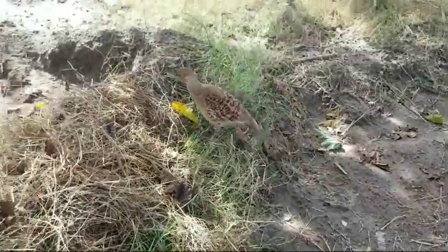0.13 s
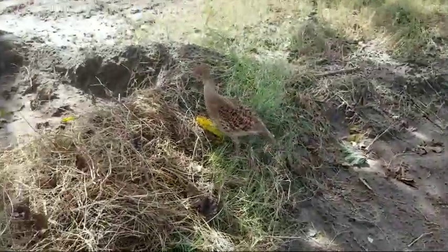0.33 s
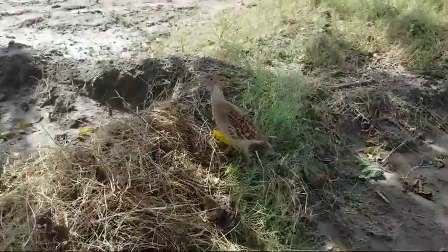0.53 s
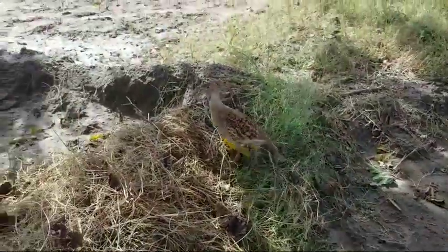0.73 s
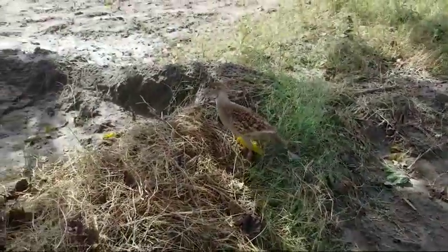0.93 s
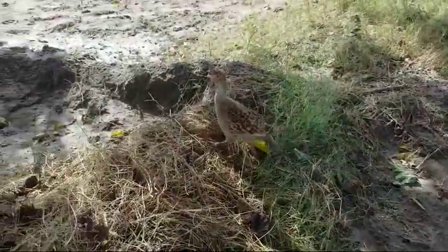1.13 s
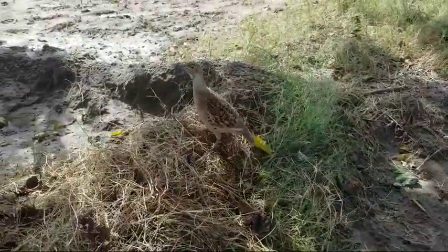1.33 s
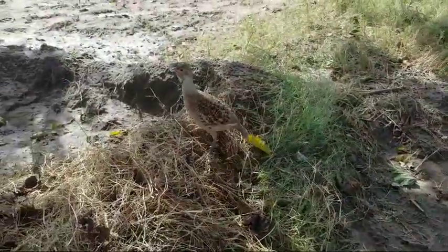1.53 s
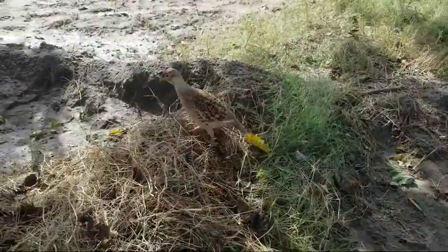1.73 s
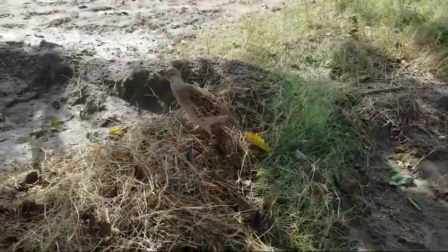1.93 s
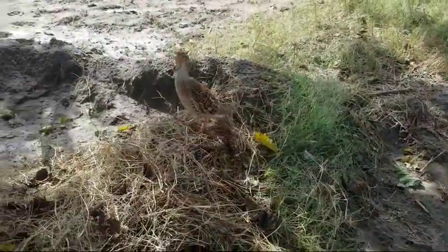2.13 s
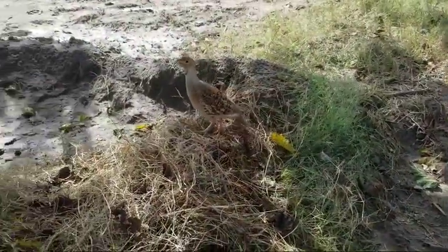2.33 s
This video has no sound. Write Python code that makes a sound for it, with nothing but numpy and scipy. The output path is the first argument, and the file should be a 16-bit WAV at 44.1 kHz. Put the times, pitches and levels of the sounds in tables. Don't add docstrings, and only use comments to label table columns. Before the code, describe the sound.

Loud partridge-like calling outdoors: a clear high whistle snaps into grating notes, then hoarse clucks die away, repeated three times, the last cut short; short ground echo, slight low wind rumble, a faint dry grass tick.

```python
import sys
import numpy as np
from scipy import signal
from scipy.fft import rfft, irfft
from scipy.io import wavfile
from scipy.ndimage import uniform_filter1d, map_coordinates

SR = 44100
rng = np.random.default_rng(int(sys.argv[2]) if len(sys.argv) > 2 else 0)


def ratio_of_db(decibels):
    return 10 ** (np.asarray(decibels, float) / 20)


def inscribe(sig):
    pcm = np.round(np.clip(np.atleast_2d(sig).T, -1, 1) * 32767)
    wavfile.write(sys.argv[1], SR, pcm.astype(np.int16))


N = 105840
T = np.arange(N) / SR


def at_hz(points, hz):
    p = np.array(points, float)
    return np.interp(np.log(hz + 1), np.log(p[:, 0] + 1), p[:, 1])


def rms_one(x):
    return x / np.sqrt(np.mean(x ** 2) + 1e-20)


def colour(x, points):
    hz = np.arange(N // 2 + 1) * SR / N
    return irfft(rfft(x) * ratio_of_db(at_hz(points, hz)), N)


def drift(rate_hz):
    r = np.exp(-2 * np.pi * rate_hz / SR)
    noise = rng.standard_normal(N + SR)
    return rms_one(signal.lfilter([1], [1, -2 * r, r * r], noise)[SR:])


def resonance(x, hz, width_hz):
    r = np.exp(-np.pi * width_hz / SR)
    poles = [1, -2 * r * np.cos(2 * np.pi * hz / SR), r * r]
    return signal.lfilter([(1 - r * r) / 2, 0, (r * r - 1) / 2], poles, x + 1e-18)


def gate(start, length, attack, release):
    ramp = np.minimum((T - start) / attack, (start + length - T) / release)
    return np.sin(np.pi / 2 * np.clip(ramp, 0, 1)) ** 2


def pulses(rate_hz, jitter, spread_db):
    cycle = np.cumsum(rate_hz * np.exp(jitter * drift(400))) / SR
    click = np.diff(np.floor(cycle), prepend=0) > 0
    return click * ratio_of_db(spread_db * rng.standard_normal(N)) * np.sqrt(SR / rate_hz)


def field():
    # frequency in Hz, level in dB.
    hiss_colour = [(300, 7), (500, 6), (1200, 3), (3000, 0.5), (8000, -0.5), (15500, -1.5)]
    return ratio_of_db(-68.5) * rms_one(colour(rng.standard_normal((2, N)), hiss_colour))


def wind():
    # time in seconds, level in dB.
    wind_level = [
        (0, -65),
        (.3, -65.5),
        (.75, -62.5),
        (1.2, -64.5),
        (1.55, -64.5),
        (1.63, -58.5),
        (1.75, -79.5),
        (2.4, -91.5),
    ]
    # frequency in Hz, level in dB.
    wind_colour = [(15, -33.5), (30, -5), (80, 1.5), (130, -4.5), (310, -18.5), (450, -36), (900, -49),
                   (16000, -65.5)]
    alike, patchy_db = 0.7, 1.5
    mid, side = colour(rng.standard_normal((2, N)), wind_colour)
    pair = rms_one(np.sqrt(1 + alike) * mid + np.sqrt(1 - alike) * side * [[1], [-1]])
    level_db = np.interp(T, *np.transpose(wind_level)) + 2.5
    return pair * ratio_of_db(level_db + patchy_db * drift(2.7))


def gulps():
    # start in seconds, level in dB.
    gulp_events = [
        (.171, -34.5),
        (0.949, -35),
        (1.796, -41),
    ]
    length_s, start_hz, sag = 0.027, 286, 0.62
    out, ring = np.zeros(N), np.zeros(N)
    for hz, width, outer_width, db in [(1320, 400, 550, -17.5), (3660, 500, 600, -20.5)]:
        narrow = resonance(rng.standard_normal(N), hz, width)
        ring += ratio_of_db(db) * rms_one(resonance(narrow, hz, outer_width))
    for s, db in gulp_events:
        t = T - s
        phase = 2 * np.pi * start_hz * t * (1 - sag * t / length_s / 2)
        tone = np.sin(phase) + ratio_of_db(-14.5) * np.sin(2 * phase)
        out += ratio_of_db(db) * gate(s, length_s, 0.0036, 0.0085) * (tone + ring)
    return out


def whistles():
    # time in seconds, pitch in Hz, level in dB.
    whistle_paths = [
        [(.189, 3350, -51), (.194, 3427, -29.5), (.198, 3695, -17.5), (.206, 3762, -10), (.218, 3859, -14.5),
         (.254, 3877, -16), (.31, 3801, -14), (.34, 3815, -25.5), (.349, 3890, -55.5)],
        [(.973, 3477, -50.5), (.977, 3600, -30.5), (.988, 3800, -12), (1.01, 3926, -12), (1.03, 3980, -15.5),
         (1.06, 3974, -14.5), (1.12, 3968, -16.5), (1.14, 3897, -23), (1.157, 3730, -52.5)],
        [(1.819, 3400, -50.5), (1.824, 3440, -35), (1.833, 3850, -16.5), (1.846, 3948, -16),
         (1.851, 4063, -25.5), (1.858, 4245, -18.5), (1.93, 4273, -18), (2.0, 4184, -29), (2.018, 4220, -49)],
    ]
    # start in seconds, length in seconds, offset from the whistle in Hz, level in dB.
    second_side = [(0.265, .02, 200.5, -8.5), (1.033, .024, 237, -13), (1.086, .028, 244, -8.5),
                   (1.118, 0.023, 253.5, -11.5), (1.138, .026, 261, 4), (1.842, 0.041, -290, -19),
                   (1.941, 0.021, -290, -8.5), (1.965, 0.034, -290, -10)]
    # time in seconds, half width in seconds, depth in dB.
    falters = [
        (0.278, .014, 13),
    ]
    # frequency in Hz, level in dB.
    breath_colour = [(500, -19.5), (1500, -5.5), (4000, -16), (6500, -1.5), (7500, -15.5), (10000, -4.5),
                     (14500, -4), (16000, -8)]
    # left over right in dB, octave level in dB, last fade in seconds.
    pans_db = [-3, -3, 0.7]
    octaves_db = [-54.5, -49, -34.5]
    fades_s = [.008, .017, .016]
    breath_lead_s, breath_lag_s, breath_follows = 0.002, 0.02, 0.24
    waver_hz, flutter_db = 6.2, 0.62

    out = np.zeros((2, N))
    breath = ratio_of_db(-44) * rms_one(colour(rng.standard_normal(N), breath_colour))
    falter_db = sum(db * np.exp(-((T - s) / d) ** 2) for s, d, db in falters)
    beat = 1 + ratio_of_db(-23.5) * drift(469)
    for s, d, hz, db in second_side:
        beat = beat + ratio_of_db(db) * gate(s, d, 0.0032, 0.006) * np.exp(2j * np.pi * hz * T)
    for rows, octave_db, pan_db, fade in zip(whistle_paths, octaves_db, pans_db, fades_s):
        s, hz, db = np.transpose(rows)
        pitch = uniform_filter1d(np.interp(T, s, hz), size=200) + waver_hz * drift(50)
        phase = 2 * np.pi * np.cumsum(pitch) / SR
        level_db = uniform_filter1d(np.interp(T, s, db), size=100)
        tone = ratio_of_db(flutter_db * drift(69) - falter_db) * np.imag(beat * np.exp(1j * phase))
        tone += ratio_of_db(octave_db) * np.sin(2 * phase)
        voiced = np.sqrt(2) * tone * ratio_of_db(level_db) * gate(s[0], s[-2] + fade - s[0], 0.0026, 0.004)
        breathing = gate(s[0] - breath_lead_s, s[-1] - s[0] + breath_lag_s, 0.014, 0.03)
        air = breath * ratio_of_db(breath_follows * (level_db - db.max())) * breathing
        out += (voiced + air) * ratio_of_db([[pan_db / 2], [-pan_db / 2]])
    return out


def rasp():
    # start in seconds, length in seconds, level in dB, pulse rate in Hz.
    stretches = [(0.388, 0.034, -21.5, 934.5), (0.413, 0.036, -23.5, 936.2), (0.446, 0.071, -27, 971.7),
                 (0.479, 0.023, -20.5, 975.2), (0.5, 0.038, -19, 912), (1.147, 0.05, -27.5, 904.5),
                 (1.176, 0.036, -23.5, 978.5), (1.201, 0.046, -27.5, 1002), (1.237, 0.036, -24.5, 1000),
                 (1.256, 0.058, -28, 865.2), (2.033, 0.053, -23.5, 952), (2.08, 0.045, -38, 1044),
                 (2.11, 0.022, -26, 1014), (2.123, 0.052, -27, 894)]
    # resonance in Hz, width in Hz, level in dB.
    tract = [(1050, 910, -15), (2110, 2100, -1), (2671, 1700, 1), (4060, 2000, -4.5), (5360, 1400, -8.5),
             (10100, 2900, -11.5), (13500, 6600, -14.5)]
    jitter, spread_db, patch_db, hiss_db, trim_db = 0.065, 1.5, 4.0, -13, -2
    rate, swell = np.full(N, 950.), np.zeros(N)
    for s, d, db, hz in stretches:
        rate[T >= s] = hz
        swell += ratio_of_db(db + trim_db) * gate(s, d, 0.0029, 0.45 * d)
    source = pulses(rate, jitter, spread_db) + ratio_of_db(hiss_db) * rng.standard_normal(N)
    throat = np.zeros(N)
    for k, (hz, width, db) in enumerate(tract):
        band = rms_one(resonance(resonance(source, hz, width), hz, width * 2))
        throat += (-1) ** k * ratio_of_db(db + patch_db * drift(70)) * band
    return swell * rms_one(throat)


def creaks():
    # start in seconds, length in seconds, level in dB, pulse rate in Hz, throat peak in Hz.
    creak_runs = [(0.396, 0.012, -20.5, 972, 2930), (0.406, .012, -17, 985, 3070),
                  (0.43, 0.041, -29, 891, 2880), (0.482, .015, -19.5, 945, 2820),
                  (1.185, 0.011, -19.5, 992, 2930), (1.195, 0.011, -22.5, 1048, 4100),
                  (1.24, 0.018, -23.5, 1023, 4000), (2.031, 0.0088, -26, 1014, 2780),
                  (2.043, 0.014, -23.5, 982, 2950), (2.05, .012, -31.5, 988, 1005),
                  (2.066, 0.025, -41, 1051, 4250), (2.111, .012, -30.5, 996, 988),
                  (2.117, 0.015, -28, 1000, 3014), (2.154, 0.0038, -22, 898.4, 1800),
                  (2.3, 0.012, -36.5, 797.3, 803)]
    width_hz, skirt_db = 550, -16
    out, wobble = np.zeros(N), np.cumsum(1 + 0.01473 * drift(200))
    for s, d, db, hz, peak_hz in creak_runs:
        skirt = ratio_of_db(skirt_db) * (peak_hz > 2 * hz)
        tone = np.zeros(N)
        for k in range(1, 7):
            gain = np.exp(-((k * hz - peak_hz) / width_hz) ** 2) + skirt
            tone += gain * np.cos(k * (2 * np.pi * hz * wobble / SR + k))
        out += ratio_of_db(db) * gate(s, d, 0.28 * d, 0.61 * d) * tone
    return out


def notes():
    # start in seconds, length in seconds, level in dB, first pitch in Hz, last pitch in Hz.
    voiced_notes = [(0.397, 0.011, -17.5, 1860, 1764), (.441, .044, -10.5, 1798, 2042),
                    (0.507, 0.01294, -8, 1919, 1800), (1.155, .03, -16, 1664, 1976),
                    (1.206, 0.036, -12.5, 2016, 2058), (1.26, 0.026, -12, 2030, 1622),
                    (1.42, .03, -22, 1750, 1448), (2.038, 0.014, -23, 1978, 1915),
                    (2.075, .038, -10, 2112, 2032), (2.133, .019, -14, 2000, 1640),
                    (2.281, 0.031, -20.5, 1800, 1587)]
    halves_db = [-19.5, 2.5, -11, 1.5, -29.5, -46, -18, -6, -36, -19.5, -18.5]
    tilts_db = [2.4, 0.53, -4.5, 3, 1, -1.5, -4.5, -2, -2.5, -5.5, -7]
    # frequency in Hz, level in dB.
    throat_colour = [(900, -24), (2000, 1), (3000, -14), (4000, -6), (6000, -14), (8000, -24.5),
                     (10200, -9), (14200, -14)]
    bend, wobble_share, break_drop, break_s = 2.5, 0.006, 0.18, 0.0016
    half_fades_hz, half_fade_db_per_hz, half_tilt_db = 1939, 0.5, 0.3
    lock_hz, unlocked_db_per_hz = 2000, 0.37

    out, wobble, noise = np.zeros(N), drift(130), rng.standard_normal(N)
    for (s, d, db, hz0, hz1), half_db, tilt_db in zip(voiced_notes, halves_db, tilts_db):
        part = slice(int(s * SR), int((s + d) * SR))
        u = np.linspace(0, 1, part.stop - part.start)
        path = 1 - (1 - u) ** bend if hz1 > hz0 else u ** np.sqrt(bend)
        steady = hz0 + (hz1 - hz0) * path
        final_break = break_drop * np.exp((u - 1) * d / break_s)
        hz = steady * (1 + wobble_share * wobble[part] - final_break)
        phase = np.pi * np.cumsum(hz) / SR
        half = ratio_of_db(half_db - half_fade_db_per_hz * np.maximum(steady - half_fades_hz, 0))
        top = ratio_of_db(-unlocked_db_per_hz * np.maximum(lock_hz - steady, 0))
        tone = 0
        for k in range(1, 16):
            gain = ratio_of_db(at_hz(throat_colour, k * hz / 2) + tilt_db * np.log2(max(k, 2) / 2))
            if k % 2:
                gain = gain * half * ratio_of_db(-half_tilt_db * max(k - 5, 0))
            if k > 6:
                gain = gain * top
            tone = tone + gain * np.cos(k * phase)
        out[part] += ratio_of_db(db) * gate(s, d, 0.004, 0.003)[part] * tone * (1 + ratio_of_db(-40) * noise[part])
    return out


def ticks():
    # time in seconds, peak level in dB.
    snaps = [
        (0.5842, -40),
        (0.6111, -36),
    ]
    burst = sum(ratio_of_db(db) * (T > s) * np.exp(-np.abs(T - s) / 0.002) for s, db in snaps)
    highpass = signal.butter(2, 3000, "high", fs=SR, output="sos")
    return signal.sosfilt(highpass, burst * rng.standard_normal(N))


def clucks():
    # start in seconds, length in seconds, level in dB, pulse rate in Hz.
    cluck_events = [(0.651, .055, -31.5, 609.3), (0.751, .055, -33.5, 451.3), (0.853, .05, -36, 411.5),
                    (.96, .04, -65.5, 408), (1.4, .06, -31, 800), (1.507, .06, -31.5, 656.4),
                    (1.615, .05, -32.5, 430.7), (1.722, 0.049, -40.5, 420), (1.831, 0.032, -61.5, 415),
                    (2.264, 0.064, -31, 804.7), (2.375, .06, -31.5, 707)]
    # resonance in Hz, width in Hz, level in dB, share of brightening.
    tract = [(420, 370, -19.5, 0.04), (826, 420, -12.5, 0.05), (1120, 317, -1.5, -0.16),
             (1800, 297, -5, 1.48), (2843, 290, -14, 1.2), (4046, 330, -22.5, 0.68),
             (4800, 1200, -24, 2.21), (11800, 2300, -32.5, 3.5)]
    sag, peak_at, foot, trim_db = 0.35, 0.57, 0.25, -1.5
    jitter, spread_db, hiss_db, patch_db = 0.055, 2.0, -12, 3.0
    brighter_db_per_db, rougher_db_per_db = 3.5, 0.8

    rate, swell, force_db = np.full(N, 500.), np.zeros(N), np.zeros(N)
    for s, d, db, hz in cluck_events:
        on = T >= s - 0.005
        sagging = hz * (1 - sag * np.clip((T - s) / d - 0.5, -1, 1))
        rate[on], force_db[on] = sagging[on], db + 33.0
        body = gate(s, d, peak_at * d, (1 - peak_at) * d) ** 1.37
        swell += ratio_of_db(db + trim_db) * (body + foot * gate(s, d + 0.0054, 0.002, 0.083))
    hoarse = ratio_of_db(rougher_db_per_db * np.clip(force_db, -3, 4))
    source = pulses(rate, jitter * hoarse, spread_db * hoarse)
    source += ratio_of_db(hiss_db) * hoarse * rng.standard_normal(N)
    throat = np.zeros(N)
    for k, (hz, width, db, share) in enumerate(tract):
        level_db = db - 5 + share * brighter_db_per_db * force_db + patch_db * drift(40)
        band = rms_one(resonance(resonance(source, hz, width), hz, width * 2))
        throat += (-1) ** k * ratio_of_db(level_db) * band
    return swell * throat


def cores():
    # start in seconds, length in seconds, level in dB, first pitch in Hz, last pitch in Hz.
    sung_cores = [(0.67, 0.034, -40.5, 1900, 1757), (.772, 0.029, -38.5, 1409, 1136),
                  (0.858, 0.017, -46.5, 1300, 1107), (0.873, 0.027, -46, 1200, 1257),
                  (1.44, 0.013, -46, 799, 759), (1.619, 0.037, -38, 1168, 1317),
                  (1.634, 0.023, -38.5, 1330, 1186), (1.728, 0.0361, -41, 1308, 1185)]
    out, wobble, flutter = np.zeros(N), 1 + 0.03 * drift(250), ratio_of_db(1.9 * drift(250))
    for s, d, db, hz0, hz1 in sung_cores:
        hz = (hz0 + (hz1 - hz0) * np.clip((T - s) / d, 0, 1)) * wobble
        tone = np.sin(2 * np.pi * np.cumsum(hz) / SR)
        out += ratio_of_db(db + 2) * gate(s, d, 0.35 * d, 0.17 * d) * flutter * tone
    return out


def echo(x):
    early_db, early_t60_s = -9.5, 0.11
    late_db, late_t60_s, late_cut_hz = -35, 0.9, 3000
    t, noise = T[:SR // 2], rng.standard_normal((2, 2, SR // 2))
    dull = signal.lfilter(*signal.butter(1, late_cut_hz, fs=SR), noise[0])
    late = dull * ratio_of_db(late_db - 60 * t / late_t60_s) / np.sqrt(late_t60_s)
    early = noise[1] * ratio_of_db(early_db - 60 * t / early_t60_s) / np.sqrt(early_t60_s)
    response = (late + early) * (t > 0.002) * np.sqrt(6 * np.log(10) / SR)
    return signal.fftconvolve(x[None], response, axes=1)[:, :N]


def ports(x):
    # frequency in Hz, left over right in dB.
    port_db = [(60, -1), (130, -2), (290, -3.5), (640, -4.5), (1410, 0.5), (3100, -7.5), (6820, -7.5),
               (15000, 0)]
    # frequency in Hz, left lead in radians.
    port_phase = [(0, 0), (4310, 1.29), (5080, 5), (6720, 2), (10500, 9.5), (12200, 9), (13400, 12.5),
                  (16000, 12.5)]
    # time in seconds, right delay in samples.
    walk_lag = [
        (0, -0.59),
        (.5, 0.47),
        (1.5, 0.7),
        (2.4, 1),
    ]
    hz = np.arange(N // 2 + 1) * SR / N
    half = ratio_of_db(at_hz(port_db, hz) / 2) * np.exp(.5j * np.interp(hz, *np.transpose(port_phase)))
    left, right = irfft(rfft(x) * [half, 1 / half], N) * np.minimum(20 * T, 1) ** 2
    moment = np.arange(N) - np.interp(T, *np.transpose(walk_lag))
    return np.array([left, map_coordinates(right, [moment], order=3)])


def scene():
    bird = gulps() + whistles() + rasp() + creaks() + notes() + clucks() + cores()
    return ports(bird + ticks()) + echo(bird.mean(axis=0)) + wind() + field()


def band_limit(x):
    return signal.sosfilt(signal.butter(12, 16450, fs=SR, output="sos"), x)


def record(dry):
    ceiling, top_hz = 0.97, 15300
    lowpass = signal.butter(8, top_hz, fs=SR, output="sos")
    mix = signal.sosfilt(lowpass, np.clip(dry, -ceiling, ceiling))
    return band_limit(mix)


dry = scene()
out = record(dry)
inscribe(out)
```